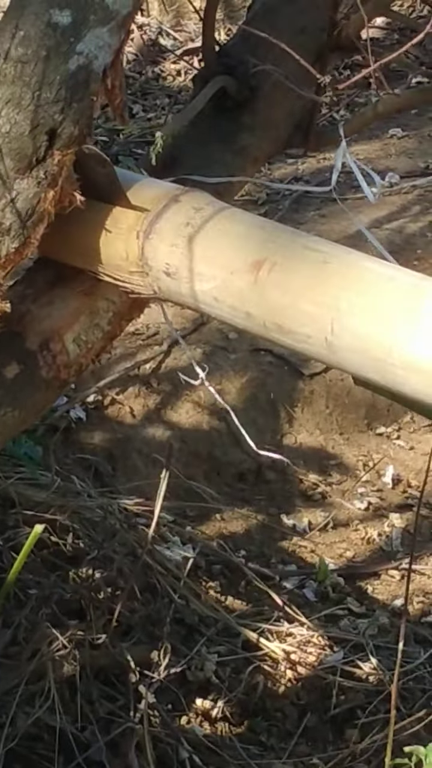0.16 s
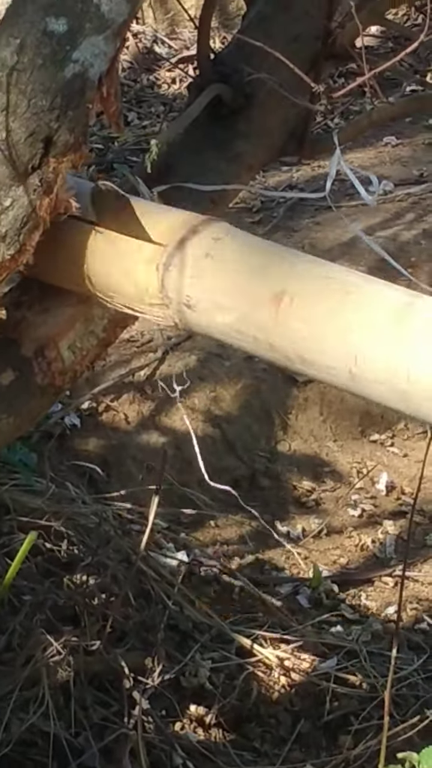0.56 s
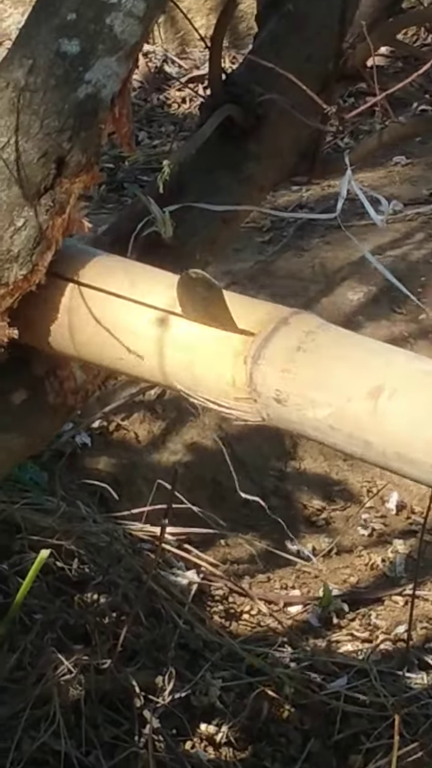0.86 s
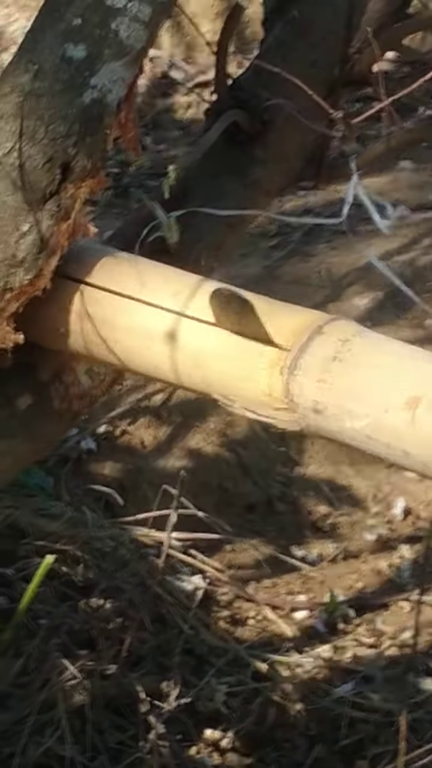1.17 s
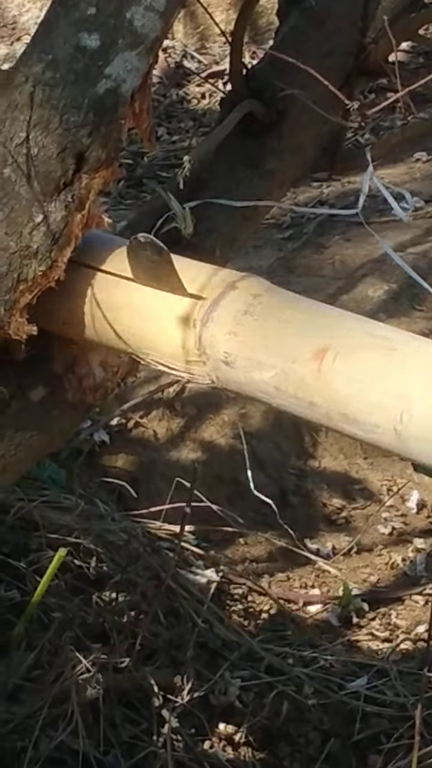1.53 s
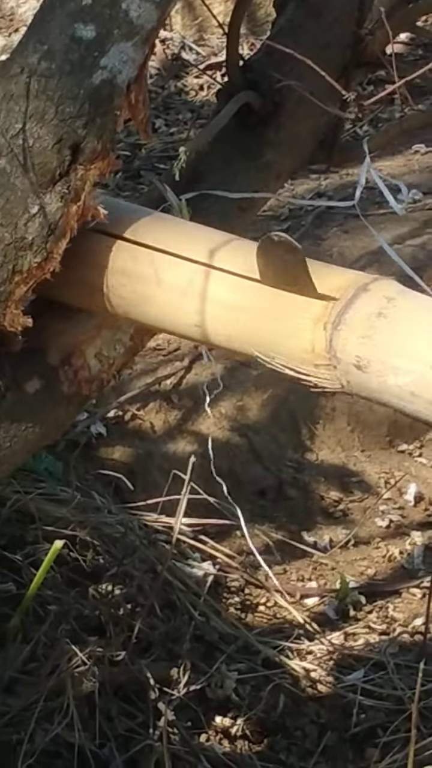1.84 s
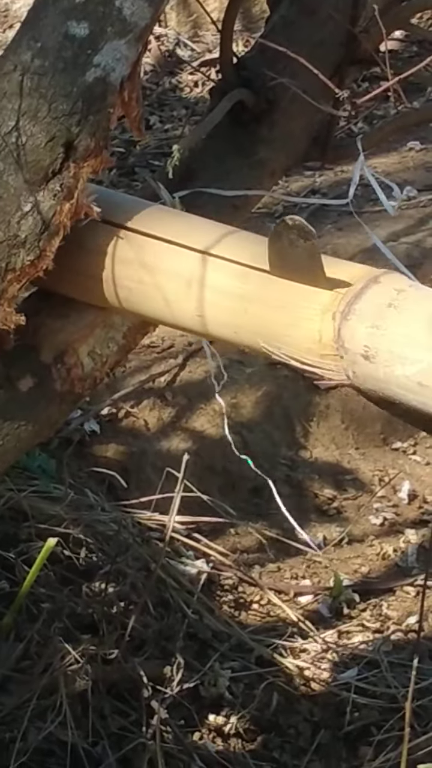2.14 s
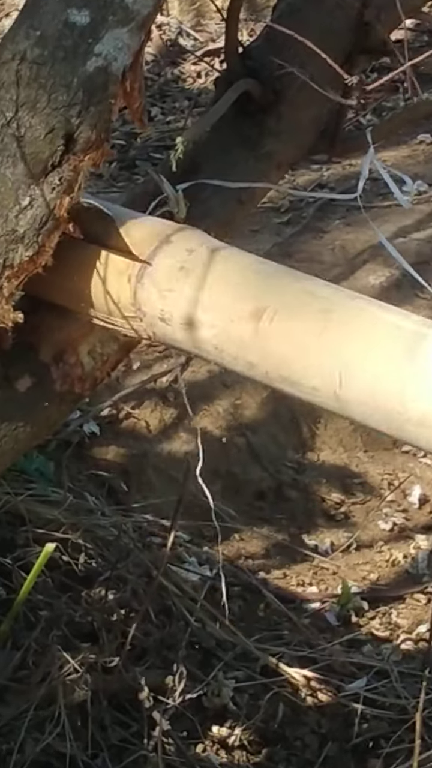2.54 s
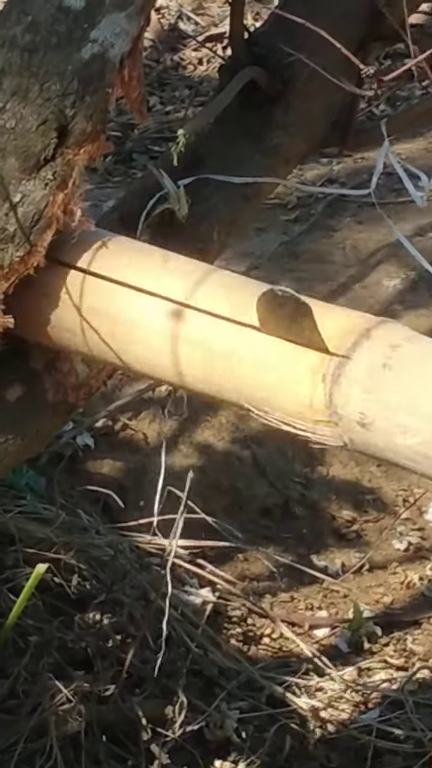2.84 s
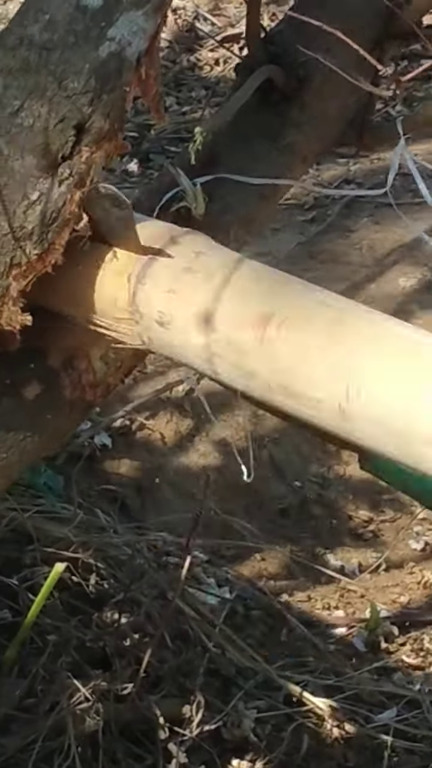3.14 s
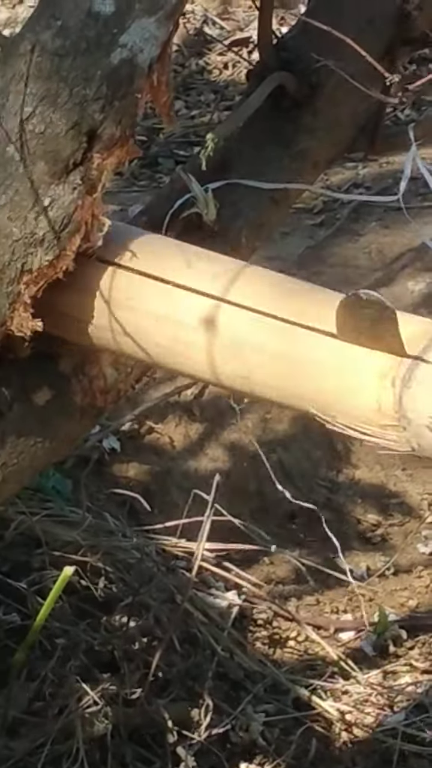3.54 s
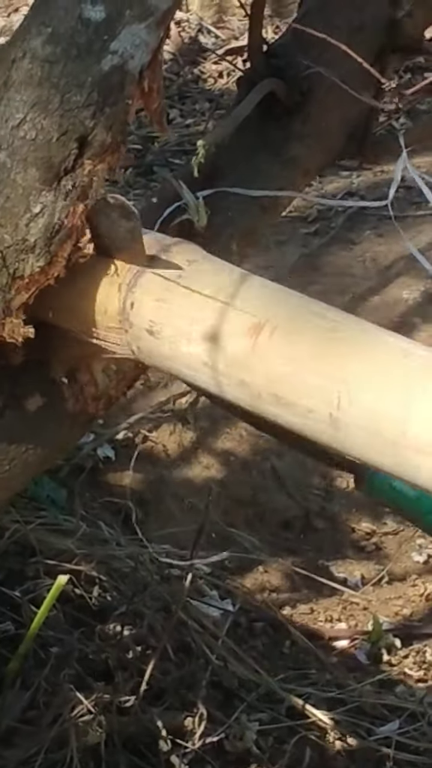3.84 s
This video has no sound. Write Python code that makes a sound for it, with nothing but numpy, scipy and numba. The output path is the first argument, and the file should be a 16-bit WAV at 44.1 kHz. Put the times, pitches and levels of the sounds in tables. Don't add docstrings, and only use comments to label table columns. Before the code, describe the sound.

Rough to-and-fro scraping of dry bamboo on metal, broken by a few loud woody cracks

```python
import sys
import numpy as np
from scipy import signal
from scipy.io import wavfile
from scipy.ndimage import uniform_filter1d
from numba import njit

SR = 44100
rng = np.random.default_rng(int(sys.argv[2]) if len(sys.argv) > 2 else 0)


def magnitude_from_level(level_db):
    exponent = np.asarray(level_db, float) / 20
    return 10 ** exponent


def store_pcm(level_fs):
    pcm = np.round(np.clip(level_fs, -1, 1) * 32767).astype(np.int16)
    wavfile.write(sys.argv[1], SR, np.atleast_2d(pcm).T)


N = 176400
T = np.arange(N) / SR

# f/Hz, spectral level/dB per Hz
AIR_SPECTRUM = [(140, -10), (350, -26), (900, -15), (2200, -18), (2800, -23.5), (4500, -32), (10500, -39),
                (14300, -35.5)]
# t/s, level/dB
GUSTS = [(0, -50), (.04, -49), (.13, -57), (.26, -50.5), (.32, -54), (.6, -57), (.8, -55), (1.0, -56),
         (1.25, -58.5), (1.45, -56), (1.7, -53.5), (1.95, -57.5), (2.3, -59), (2.7, -54.5), (3.0, -55.5),
         (3.4, -56), (3.7, -57), (4., -57.5)]
# t/s, step size, swing f/Hz, decay/s, rise/s
JOLTS = [
    (3.827, -.044, 6, .15, .004),
    (3.9235, .078, 0, .08, .0015),
]
# t/s, level/dB, pole-wall level relative to treble/dB
TICKS = [(0.2009, -51, -10), (0.2074, -51, 5), (0.3137, -43, -5), (0.6848, -42, -3), (1.28, -50, 0),
         (1.3259, -40, -7), (1.6287, -58, 11), (1.6501, -55, 3), (1.6995, -49, 4), (2.3057, -52, 1),
         (2.3436, -41, -10), (2.3436, -31, -13), (2.4049, -15, -8), (2.6773, -40, -10), (3.0689, -44, -2),
         (3.1393, -23, 7), (3.241, -37, -2), (3.3383, -35, -10), (3.3588, -36, -7), (3.7938, -38, 17),
         (3.8277, -13.5, -9), (3.9255, -38, 7), (3.9689, -34, -11)]
MORE_TICKS = [(.333, -54, 8), (1.912, -56, 2), (2.827, -41, -4), (2.95, -50, 6), (3.289, -43, -8),
              (3.322, -45, -8), (3.445, -47, -6), (3.889, -40, -4)]
# start t/s, peak t/s, end t/s, level/dB
HUMS = [
    (2.438, 2.51, 2.7, -56.5),
    (3.152, 3.165, 3.23, -55.5),
    (3.23, 3.254, 3.37, -52.5),
    (3.833, 3.877, 4.7, -53.5),
    (3.914, 3.961, 4.3, -54.5),
]
# t/s, ring level/dB, snap level/dB, contact time/ms
KNOCKS = [(0.2403, -45.5, -61, 0.21), (.249, -61, -55, 0.46), (.314, -66, -60, 0.23),
          (0.8205, -35.5, -43, 0.43), (1.354, -54, -56, 0.81), (1.447, -49.5, -56, 0.88),
          (2.4054, -19.5, -21, 1.65), (3.14, -20.5, -20.5, 0.24), (3.568, -38.5, -45, 0.35),
          (3.829, -23.5, -21.5, 0.47), (3.971, -66, -58, 0.36)]
SECTION_HIT = [5, 5, 5, 3, 3, 3, 0, 1, 4, 2, 5]
# f/Hz, level/dB, t60/s
SECTION_MODES = [
    [(96, -16.5, 0.22), (214, -6, 0.091), (603, 1.5, 0.1), (791, -2.5, 0.095), (921, 2, 0.1),
     (1197, 0, 0.1), (1860, 4.5, 0.054), (2300, -15, 0.019), (2395, 10.5, 0.041), (3170, -1, 0.034)],
    [(190, -3, .06), (501, -5, 0.19), (694, 11.5, 0.082), (884, 10, 0.061), (1100, -14, .05),
     (1247, 15, 0.044), (1757, 4.5, 0.063), (2415, 15, 0.032), (2980, 6, 0.047), (3670, 13, 0.011)],
    [(610, -5.5, 0.053), (800, -10, 0.026), (1214, -6.5, 0.1), (1841, -38, 0.038), (2280, -19, 0.027),
     (2576, 4.5, 0.028), (3190, -2, 0.017)],
    [(696, 1, 0.087), (1100, 6.5, 0.068), (1287, 4.5, 0.095), (1650, 9, 0.03), (2047, 7, 0.035),
     (2750, 0.5, 0.022)],
    [(696, -4.5, 0.11), (944, -0.5, 0.11), (1340, -10.5, 0.12), (1840, 5.5, 0.024), (2660, 1.5, 0.03)],
    [(1230, 2.5, 0.008), (2200, 4, 0.0067), (3200, -1, 0.0057)],
]
# f/Hz, width/Hz, level/dB
SNAP_BANDS = [(390, 430, 0.5), (1003, 650, 9), (2320, 940, 14.5), (4080, 1140, 8), (7900, 1940, 9),
              (14100, 3500, 8)]
# start t/s, peak t/s, end t/s, level/dB, fibre hiss level/dB
RUBS = [(-.3, .2, 0.47, -62, -2.5), (2.3, 2.7, 2.97, -61, -1.5), (3.0, 3.4, 6.2, -61, -2),
        (-.1, .02, 0.1, -55.5, -2), (.2, .212, 0.24, -53.5, -1.5), (.225, .245, 0.27, -55.5, -19),
        (.3, .34, 0.4, -62, -19), (.42, .5, 0.63, -58, -2.5), (1.24, 1.36, 1.566, -53.5, 2),
        (1.25, 1.3, 1.32, -60.5, -24), (1.44, 1.47, 1.5, -63, -12), (2.42, 2.455, 2.44, -45, 2),
        (2.485, 2.5, 2.61, -49, -7.5), (3.15, 3.18, 3.23, -49.5, -8), (3.241, 3.244, 3.417, -52.5, -2),
        (3.84, 3.885, 3.915, -49, -7), (3.923, 3.926, 4.04, -45.5, -2.5)]
# f/Hz, width/Hz, level/dB
WALL_BANDS = [(724, 920, 5), (1162, 275, 3), (2034, 270, 1), (2440, 930, 8.5), (4620, 830, -4)]
# f/Hz, width/Hz, level/dB
FIBRE_BANDS = [(6160, 2100, 1.5), (7990, 870, 4), (10400, 8300, -10.5), (15000, 5300, 1)]
# start t/s, peak t/s, end t/s, level/dB, edge hiss level/dB
PULLS = [(.6, .68, 0.77, -49.5, -6), (.72, .76, 0.86, -50.5, -3), (.882, .895, 0.97, -58, -12.5),
         (1.03, 1.06, 1.1, -71, -16), (1.07, 1.15, 1.25, -57.5, -8.5), (1.46, 1.57, 1.69, -55.5, -16),
         (1.64, 1.655, 1.68, -56, -9), (1.692, 1.71, 1.77, -52, -4.5), (1.72, 1.77, 1.857, -54, -7),
         (1.78, 1.89, 1.955, -58.5, -11), (2.16, 2.2, 2.26, -63, -10), (2.28, 2.295, 2.3, -56.5, -13),
         (2.3, 2.345, 2.573, -49, -2), (2.5, 2.6, 2.72, -63.5, 3.5), (2.68, 2.8, 3.025, -53, -2.5),
         (2.9, 2.935, 2.96, -55, -3.5), (2.97, 2.988, 3.06, -54, -16.5), (3.062, 3.076, 3.14, -51.5, -6),
         (3.08, 3.1, 3.11, -51, -6), (3.38, 3.52, 3.6, -52, -0.5), (3.58, 3.62, 3.66, -54, -14),
         (3.68, 3.74, 3.82, -54, -6), (3.76, 3.8, 3.93, -59, 1)]
# f/Hz, width/Hz, level/dB
SHEEN_BANDS = [(5630, 97, 0), (6500, 160, -4.5), (7080, 120, -4), (7910, 140, 0), (8400, 170, -4)]
# f/Hz, width/Hz, level/dB
STEEL_BANDS = [(730, 210, -9.5), (1330, 195, -6), (1930, 120, -4.5), (2180, 130, -4.5), (2686, 190, 0.5),
               (2914, 104, -3), (3141, 82, -4), (4144, 184, -3.5), (2435, 220, -3), (3697, 160, -7.5),
               (4830, 210, -15.5)]
# f/Hz, width/Hz, level/dB
EDGE_BANDS = [(6750, 3000, 2), (9720, 1000, -9), (12680, 1200, -3), (13900, 1500, -1), (14900, 2000, -13),
              (15500, 1300, 0.5)]


@njit
def glide(x, g, k):
    y, band, low = np.empty(len(x)), 0., 0.
    for i in range(len(x)):
        v = (band + g[i] * (x[i] - low)) / (1 + g[i] * (g[i] + k))
        band = 2 * v - band
        low = low + 2 * g[i] * v
        y[i] = k * v
    return y


def resonate(x, hz, width, drift=0.93):
    g = np.tan(np.pi * hz / SR) * drift * np.ones(len(x))
    once = glide(x, g, width / hz)
    return glide(once, g, width / hz)


def level(x, db):
    return x * magnitude_from_level(db) / np.sqrt(np.mean(x ** 2))


def walk(rate):
    hold = max(int(SR / rate / 32), 2)
    held = np.repeat(rng.standard_normal(N // 32 // hold + 2), hold)
    slow = uniform_filter1d(uniform_filter1d(held, hold), hold)
    return 1.3 * np.interp(T, np.arange(len(slow)) * 32 / SR, slow)


def swell(start, peak, end):
    distance = np.interp(T, [2 * start - peak, peak, 2 * end - peak], [2, 0, 2])
    return np.exp(-1.9 * distance ** 2)


def grit(spread_db):
    catches = rng.standard_normal(N)
    size_db = spread_db * np.minimum(rng.exponential(size=N), 5)
    return level(catches * magnitude_from_level(size_db), 0)


def body(x, bands, patchy_db, rate, wander):
    out = 0
    for k, (f, width, db) in enumerate(bands):
        strength = magnitude_from_level(db + patchy_db * walk(rate))
        feed = np.roll(x, k * 9973)
        out = out + strength * level(resonate(feed, f, 2.01 * width, 1 + wander * walk(rate / 2)), 0)
    return level(out, 0)


def strokes(rows, low, high, judder_db):
    force = np.array([swell(start, peak, end) * magnitude_from_level(db) for start, peak, end, db, _ in rows])
    hiss_force = magnitude_from_level(np.array(rows)[:, 4]) @ force
    return magnitude_from_level(judder_db * walk(45)) * (force.sum(0) * low + hiss_force * high)


def air():
    ambience, hz_db = 0, np.array(AIR_SPECTRUM)
    for hz in 112 * 2 ** np.arange(0, 7.1, .5):
        db = np.interp(np.log(hz), np.log(hz_db[:, 0]), hz_db[:, 1]) + 0.57 * walk(7.0)
        ambience = ambience + magnitude_from_level(db) * resonate(rng.standard_normal(N), hz, hz / 2)
    wind = 0
    for f, width, db in [(6.34, 14.5, -2.0), (37.2, 56, -3.0), (81.7, 129.5, -4.5)]:
        flutter = magnitude_from_level(db + 2.06 * walk(5.18))
        wind = wind + flutter * level(resonate(rng.standard_normal(N), f, width), 0)
    return level(ambience, -63.5) + wind * magnitude_from_level(np.interp(T, *np.array(GUSTS).T))


def jolts():
    out = np.zeros(N)
    for start, size, f, decay, rise in JOLTS:
        t = np.maximum(T - start, 0)
        out += size * np.cos(2 * np.pi * f * t) * np.exp(-t / decay) * (1 - np.exp(-t / rise))
    return out


def ticks():
    high, low, t = np.zeros(N), np.zeros(N), T[:512]
    t60_s, gain_db = 0.0082, -4
    for start, db, wall_db in TICKS + MORE_TICKS:
        i = int(start * SR)
        snap = rng.standard_normal(512) * magnitude_from_level(db + gain_db - 60 * t / t60_s)
        high[i:i + 512] += snap
        low[i:i + 512] += snap * magnitude_from_level(min(wall_db, 7))
    return resonate(high, 13700.0, 12000.) + resonate(low, 2600.0, 3200.0)


def pole_hum():
    hz = 171.6 * (1 + 0.023 * walk(25))
    phase = 2 * np.pi * np.cumsum(hz) / SR
    loudness = sum(swell(start, peak, end) * magnitude_from_level(db + 1.5) for start, peak, end, db in HUMS)
    return np.sin(phase) * magnitude_from_level(2.8 * walk(22)) * loudness


def section_ring(modes, phases, contact_ms, t):
    out = 0
    for (f, db, t60_s), (a, b, c) in zip(modes, phases):
        w = 2 * np.pi * f
        cluster = np.cos(w * (t - contact_ms / 1000) + a / 5)
        cluster = cluster + 0.57 * np.sin(1.09 * w * t + b) + 0.46 * np.sin(.89 * w * t + c)
        out = out + magnitude_from_level(db - 60 * t / t60_s) * cluster
    return out * (1 - np.exp(-(t * 1000 / contact_ms) ** 2))


def fibre_snap(noise, snap_db, contact_ms, t):
    rise = np.minimum(t * 1000 / contact_ms, 1) ** 2
    out = 0
    for f, width, db in SNAP_BANDS:
        t60_s = 0.036 * (2000 / f) ** 0.48
        dulling_db = (f > 5000) * 0.2 * (snap_db + 21.5)
        out = out + magnitude_from_level(db + dulling_db) * resonate(noise * rise * magnitude_from_level(-60 * t / t60_s), f, width)
    return out


def knocks():
    out, t = np.zeros(N + 8192), T[:8192]
    for (start, ring_db, snap_db, contact_ms), section in zip(KNOCKS, SECTION_HIT):
        noise = rng.standard_normal(8192)
        phases = 2 * np.pi * rng.random((11, 3))
        ring = section_ring(SECTION_MODES[section], phases, contact_ms, t)
        snap = fibre_snap(noise, snap_db, contact_ms, t)
        i = int(start * SR) - 30
        out[i:i + 8192] += magnitude_from_level(ring_db) * ring / ring[:400].std() + magnitude_from_level(snap_db) * snap / snap[:150].std()
    ground_lag = int(2.2 * SR / 1000)
    return out[:N] + magnitude_from_level(-15.5) * np.roll(out, ground_lag)[:N]


def fibre_rubs(rub):
    wall = body(rub, WALL_BANDS, patchy_db=2.0, rate=35, wander=0.022)
    hiss = body(rub, FIBRE_BANDS, patchy_db=2.4, rate=60, wander=.015)
    return strokes(RUBS, wall, hiss, judder_db=1.1)


def blade_sheen(pull):
    upper = body(pull, SHEEN_BANDS, patchy_db=4.0, rate=30, wander=.02)
    return magnitude_from_level(-6) * strokes(PULLS, 0, upper, judder_db=1.5)


def steel_pulls(pull):
    blade = body(pull, STEEL_BANDS, patchy_db=3.0, rate=40, wander=.015)
    edge = body(pull, EDGE_BANDS, patchy_db=3.0, rate=60, wander=.012)
    return strokes(PULLS, blade, edge, judder_db=1.4)


def scene():
    pull, rub = grit(spread_db=3.5), grit(spread_db=2.5)
    friction = steel_pulls(pull) + fibre_rubs(rub)
    pole = knocks() + pole_hum()
    background = jolts() + air()
    return (friction + pole + background + ticks() + blade_sheen(pull))[None]


def roll_off(x):
    return signal.sosfilt(signal.butter(12, 16870, fs=SR, output="sos"), x)


def record(dry):
    low_pass = signal.ellip(10, .3, 45, 15850, fs=SR, output="sos")
    mix = signal.sosfilt(low_pass, dry)
    return roll_off(mix)


dry = scene()
out = record(dry)
store_pcm(out)
```